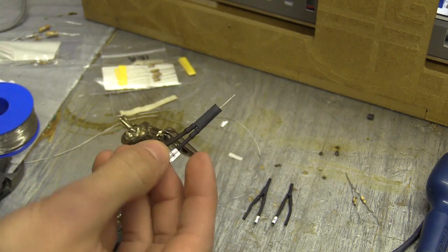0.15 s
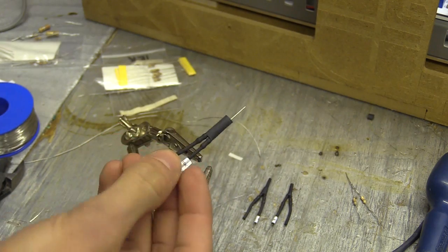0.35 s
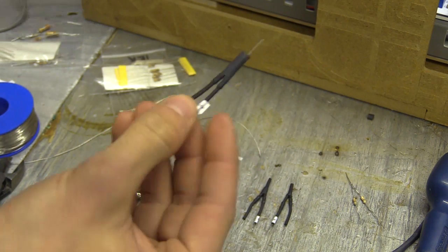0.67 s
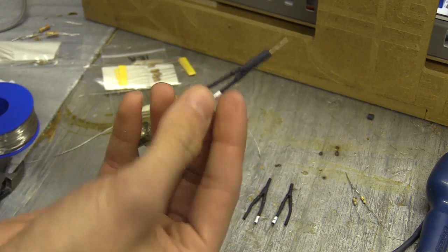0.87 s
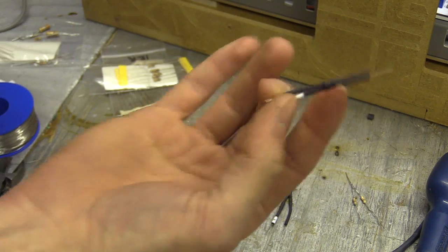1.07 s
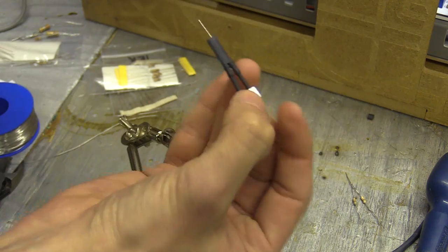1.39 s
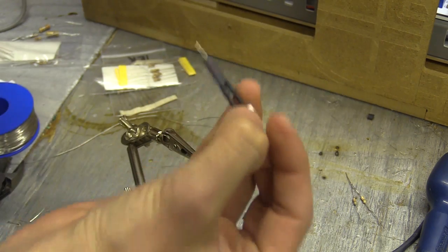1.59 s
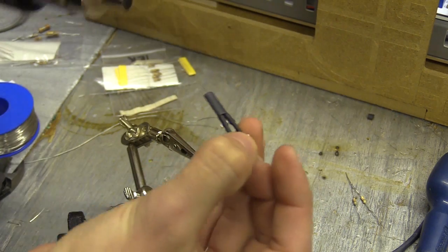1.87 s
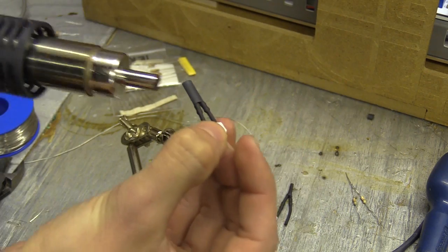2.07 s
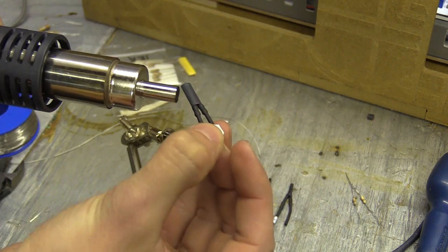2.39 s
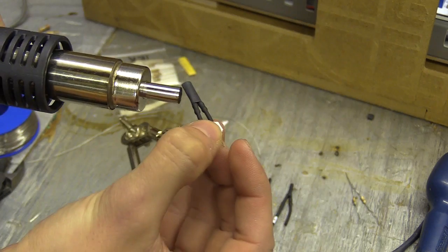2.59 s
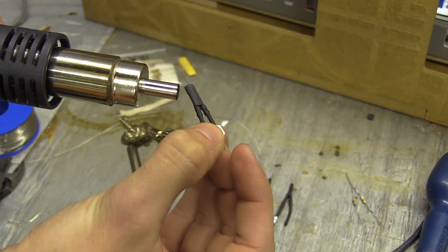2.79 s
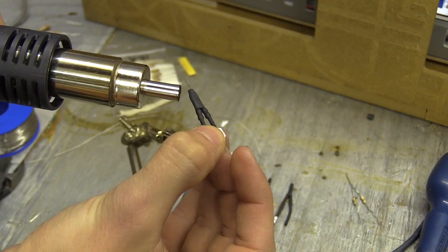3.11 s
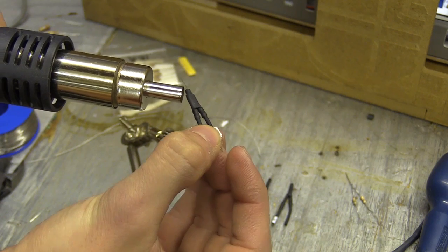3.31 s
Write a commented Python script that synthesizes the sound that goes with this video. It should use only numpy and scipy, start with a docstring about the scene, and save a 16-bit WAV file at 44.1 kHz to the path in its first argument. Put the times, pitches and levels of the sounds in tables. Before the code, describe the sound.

A hot-air heat gun spins up after handling clicks, blowing steady hiss with a high whine.

```python
"""A heat gun on a wooden workshop bench, heard close by a mono microphone (same signal on both channels).
First it is handled: taps ring bench, grip, casing and metal as mode clusters, and shaped noise scrapes and rustles.
At 0.76 s it is switched on: brush tones and a fan whine glide up with the shaft inside the air jet's hiss.
Near 1.2 s it is lifted with a run of knocks, the hum stops and the brush tones sink into the hiss.
It turns partly towards the work and back, then from 1.98 s fully; room tone lies under everything."""
import sys
import numpy as np
from scipy import signal
from scipy.io import wavfile
from scipy.ndimage import uniform_filter1d

SR = 44100
rng = np.random.default_rng(int(sys.argv[2]) if len(sys.argv) > 2 else 0)


def persist_wave(psi):
    """Save psi, clipped to +-1, as 16-bit WAV."""
    counts = np.round(np.clip(psi, -1, 1) * 32767).astype(np.int16)
    wavfile.write(sys.argv[1], SR, np.atleast_2d(counts).T)


N = 152145
T = np.arange(N) / SR  # s


def amp(db):
    """Decibels to linear amplitude."""
    return 10 ** (np.asarray(db, float) / 20)


def evened(x):
    """Scale to unit RMS."""
    return x / np.sqrt(np.mean(x ** 2) + 1e-20)


def read(points, hz):
    """Read a frequency table in dB, interpolated over log frequency."""
    f, value = np.transpose(points)
    return np.interp(np.log(hz + 1), np.log(f + 1), value)


def curve(table, column=1):
    """Follow one column of a time table sample by sample."""
    rows = np.array(table)
    return np.interp(T, rows[:, 0], rows[:, column])


def drift(top_hz):
    """Slow random wandering of unit RMS: sines from 0.3 Hz to top_hz, the slower ones stronger."""
    waves = (np.sin(2 * np.pi * (f * T + rng.random())) / np.sqrt(f)
             for f in np.geomspace(.3, top_hz, num=24))
    return evened(sum(waves))


def noise(shape_db, patchy_db):
    """Unit-RMS noise from random short-time spectra; shape_db(hz, s) colours it, with drifting patches."""
    hz = np.fft.rfftfreq(1024, 1 / SR)[:, None]
    t = np.arange(N // 256 + 5) * 256 / SR
    real, imaginary, patches = rng.standard_normal((len(t), len(hz), 3)).T
    patches = uniform_filter1d(patches, size=10, axis=0)  # smooth over frequency
    patches = evened(uniform_filter1d(patches, size=14, axis=1))  # smooth over time
    spectra = (real + 1j * imaginary) * amp(shape_db(hz, t) + patchy_db * patches)
    return evened(signal.istft(spectra, nperseg=1024, noverlap=768)[1][:N])


def steady_noise(colour, patchy_db):
    """Noise whose mean colour stays put, read from a (frequency [Hz], density [dB per Hz]) table."""
    return noise(lambda hz, t: read(colour, hz) + 0 * t, patchy_db)


SWITCH_S, SPIN_UP_S = .757, .232  # switch-on time, spin-up time constant


def speed(t):
    """Share of full speed: the shaft closes in exponentially after switch-on."""
    return np.clip(1 - np.exp((SWITCH_S - t) / SPIN_UP_S), 0, 1)


# Air hiss at the microphone: (time [s], level [dB])
JET_LEVEL = [(.76, -71), (.84, -57.5), (.95, -45.5), (1.06, -38.5), (1.22, -33.5), (1.45, -32), (1.75, -30),
             (1.96, -30), (2.2, -28), (2.62, -27), (3.1, -27.5), (3.45, -27.5)]
# Turn of the nozzle: (time [s], share of the turn towards the work [0-1])
NOZZLE_TURN = [(1.4, 0), (1.7, .25), (1.98, 0.00054), (2.1, 0.85), (2.4, 1)]
# Relative hiss colour, nozzle turned away: (frequency [Hz], density [dB per Hz])
ASIDE_COLOUR = [(60, -28), (100, -24.5), (240, -10.5), (470, -12), (900, -15), (1500, -18), (1700, -10.5),
                (2340, -12), (2830, -6), (3700, -7), (4500, -11), (5300, -4.5), (6000, -2.5), (6600, -4.5),
                (7400, 2.5), (8100, -4.5), (9000, -6), (10100, -3.5), (11500, -10.5), (13500, -17.5),
                (14500, -19), (15700, -13)]
# Relative hiss colour, nozzle over the work: (frequency [Hz], density [dB per Hz])
AIMED_COLOUR = [(60, -45), (100, -25), (243, -18), (489, -16), (778, -20), (1190, -18), (1320, -22),
                (2020, -14), (3420, -14), (4300, -11), (4700, -8), (5300, -1), (5650, -3), (5880, -7),
                (6100, -3), (6900, -4), (7650, -10), (8100, -7), (8700, -10), (9250, -7), (9950, -18),
                (10400, -10), (11400, -11), (11750, -14), (12500, -10), (13500, -22), (14200, -19),
                (14700, -25), (15150, -27), (15500, -20)]
DULL_DB, DULL_HZ = -36, 6960  # treble slope at standstill (dB per octave), and where it starts
PATCHY_DB, SWELL_DB = 1.1, .4  # RMS unevenness of hiss colour and of hiss level


def jet():
    """Air hiss: turbulent noise recoloured as the nozzle turns, its treble growing with fan speed."""
    def shape_db(hz, t):
        aim = np.clip(np.interp(t, *np.transpose(NOZZLE_TURN)), 0, 1)
        db = (1 - aim) * read(ASIDE_COLOUR, hz) + aim * read(AIMED_COLOUR, hz)
        octaves_up = np.log2(np.maximum(hz / DULL_HZ, 1))
        db = db + DULL_DB * (1 - speed(t)) * octaves_up
        return db - 10 * np.log10((amp(db) ** 2).mean(0))  # equal power at every moment

    level = amp(curve(JET_LEVEL) + SWELL_DB * drift(5.9))
    return (T > SWITCH_S) * level * noise(shape_db, PATCHY_DB)


# Shaft speed once spun up: (time [s], turns per second [Hz])
SHAFT_SPEED = [(1.9, 383.6), (2.3, 383.9), (2.8, 382.5), (3.05, 383.1), (3.3, 382.3), (3.45, 383.0)]
# Brush tones, four contacts a turn: one shaft order each [multiples of shaft speed]
BRUSH_TONE_ORDERS = (12, 20, 24, 28, 36)
# Relative level of each brush tone, in the same order: (level [dB])
BRUSH_TONE_LEVELS = (-2, 0, -1, -2, -3)
# How the casing passes the brush tones: (frequency [Hz], gain [dB])
CASING_VENTS = [(1500, -25), (2600, -8), (3400, -9), (4300, -14), (4900, -1), (6300, 0), (7500, 0),
                (8300, -14), (12000, -30)]
# Lasting whines: (time [s], order-16 tone RMS level [dB], fan whine RMS level [dB])
WHINE_LEVELS = [(.8, -95, -95), (.88, -75, -60), (.96, -64, -50), (1.09, -58, -48), (1.14, -48, -48),
                (1.3, -45, -51), (1.45, -44, -55), (1.6, -42, -52), (2.0, -42, -50), (2.12, -35, -46),
                (2.6, -35, -45), (3.0, -35, -42), (3.45, -33, -41)]
MAIN_ORDER, FAN_ORDER = 16, 33  # multiples of shaft speed
BRUSH_DB, BRUSH_FADE_S, BRUSH_FADE_DB = -7, (1.1, 1.25), -22  # re hiss level; the fade; its depth
BRUSH_FLUTTER_DB, TONE_FLUTTER_DB = 3, 1.5  # RMS
WAVER = .0004  # RMS share of shaft speed


def motor():
    """Shaft orders follow the speed: brush tones that sink into the hiss, and two whines that stay."""
    hz = curve(SHAFT_SPEED) * speed(T) * (1 + WAVER * drift(10))
    turn = 2 * np.pi * np.cumsum(hz) / SR  # shaft angle, rad
    brush_level = curve(JET_LEVEL) + BRUSH_DB + np.interp(T, BRUSH_FADE_S, [0, BRUSH_FADE_DB])
    out = np.zeros(N)
    for order, db in zip(BRUSH_TONE_ORDERS, BRUSH_TONE_LEVELS):
        tone_db = brush_level + db + read(CASING_VENTS, order * hz) + BRUSH_FLUTTER_DB * drift(30)
        out += amp(tone_db) * np.sin(order * turn)
    for column, order in enumerate((MAIN_ORDER, FAN_ORDER), 1):
        tone_db = curve(WHINE_LEVELS, column) + TONE_FLUTTER_DB * drift(40)
        out += np.sqrt(2) * amp(tone_db) * np.sin(order * turn)
    return out * (T > SWITCH_S)


# Taps and knocks: (time [s], bench, grip, casing and small metal part levels [dB each],
# rise [s, never under 0.1 ms], ring [multiple of the mode tables' T60])
KNOCKS = [(0.054, -40, -47, -51, -28.5, 0.00036, 0.83), (.105, -54, -51.5, -57, -54, .001, 1.2),
          (.291, -48.5, -51, -66, -52, 0.0014, 2.5), (.345, -43.5, -61, -64, -64, 0.0016, 0.63),
          (.384, -52, -45.5, -62, -58, 0.016, 1.7), (.412, -65, -53, -63, -61, 0.0026, 0.5),
          (.437, -55, -60, -70, -63, 0.0027, 1.3), (0.462, -38, -46.5, -39, -37, 0.0072, 1.15),
          (.506, -40, -58, -57, -66, 0.014, 0.54), (0.6318, -70, -66, -61, -43.5, 0.000075, .4),
          (1.192, -46.5, -52, -70, -70, .004, 1.2), (1.2349, -31.5, -41, -43, -38, 0.00088, 1.6),
          (1.2484, -35, -36.5, -29.5, -46, .0003, 0.6), (1.2555, -32, -39, -41.5, -62, 0.00069, 1.3),
          (1.273, -35.5, -50, -51, -70, 0.0016, 1.2), (1.978, -62, -40, -70, -75, 0.0052, 1.4),
          (3.22, -47, -55, -69.5, -66.5, 0.0049, 1.3)]
# Wooden bench modes: (frequency [Hz], level [dB], T60 at ring 1 [s])
BENCH_MODES = [(239, -1, 0.08), (298, -2, 0.084), (387.5, 10.5, 0.048), (488.7, 8.5, 0.081),
               (598, -1.5, 0.065), (673, 5, 0.041)]
# Grip modes: (frequency [Hz], level [dB], T60 at ring 1 [s])
GRIP_MODES = [(843, -3.5, 0.03), (990, 4, 0.039), (1164, -2.5, 0.062), (1453, -2.5, 0.024)]
# Casing modes: (frequency [Hz], level [dB], T60 at ring 1 [s])
CASING_MODES = [(1760, -3.5, .03), (1918, 3.5, 0.042), (2395, 3, 0.061), (2940, -3, 0.097),
                (3340, -4, 0.02), (3740, 3.5, 0.049)]
# Small metal part modes: (frequency [Hz], level [dB], T60 at ring 1 [s])
METAL_MODES = [(3770, -8, 0.057), (4270, 4.5, 0.036), (4780, 8.5, 0.023), (5260, 10, 0.017),
               (5950, 6.5, 0.023), (6170, -3, 0.024), (7370, 3.5, 0.022), (8200, 0, .025),
               (9500, -5, 0.024), (10070, 3.5, 0.012), (11300, -1, 0.023), (12400, 9, 0.011),
               (13500, 5, .012), (15200, 8, 0.018)]
SPREAD_DB, CLUSTER = 3, .045  # random spread of level, and of frequency as a share, in a mode cluster
BASS_CUT_HZ = 190


def hits():
    """Each contact rings bench, grip, casing and metal; a mode is four unevenly excited neighbours."""
    out, t = np.zeros(N + SR), np.arange(SR // 8) / SR
    for s, *parts_db, rise, ring in KNOCKS:
        for modes, part_db in zip((BENCH_MODES, GRIP_MODES, CASING_MODES, METAL_MODES), parts_db):
            hz, db, t60 = np.repeat(modes, 4, 0).T[:, :, None]
            size, detune, phase = rng.standard_normal((3, len(hz), 1))
            decay = amp(db + SPREAD_DB * size - 60 * t / (ring * t60))
            cycles = hz * (1 + CLUSTER * detune) * t + phase
            body = (decay * np.sin(2 * np.pi * cycles)).sum(0)
            sound = body * np.minimum(t / max(rise, 1e-4), 1)
            start_rms = np.sqrt(np.mean(sound[:SR // 80] ** 2))  # first 12.5 ms
            out[round(s * SR):][:len(t)] += amp(part_db) * sound / start_rms
    bass_cut = signal.butter(3, BASS_CUT_HZ, "high", fs=SR, output="sos")
    return signal.sosfilt(bass_cut, out[:N])


# Things slide and rub: (start [s], length [s], low scrape level [dB], high rustle level [dB])
SLIDES = [(0, 0.041, -50.5, -61.5), (0.053, 0.082, -52, -55), (0.255, 0.024, -58, -54.5),
          (.29, 0.043, -52, -59.5), (.335, 0.099, -48, -58.5), (0.459, 0.056, -59, -49),
          (0.532, 0.087, -85, -54.5), (0.631, 0.026, -72, -52), (0.713, 0.1, -56, -65)]
# Relative colour of the scrape on wood: (frequency [Hz], density [dB per Hz])
SCRAPE_COLOUR = [(150, -28), (250, 1.5), (480, 3.5), (750, -2), (1100, -5.5), (1600, -11.5), (2600, -20),
                 (4000, -46)]
# Relative colour of the rustle: (frequency [Hz], density [dB per Hz])
RUSTLE_COLOUR = [(1200, -31), (2500, -10.5), (3500, -0.5), (5300, -0.5), (7500, -7), (10200, -5.5),
                 (15700, -17)]
RUB_EDGE_S = 0.024  # ramp, centred on each start and end


def sliding():
    """Friction as gated noise: low scrape on the wood and a thin rustle of fingers and wire."""
    low, high = steady_noise(SCRAPE_COLOUR, 4.3), steady_noise(RUSTLE_COLOUR, 4.1)
    out = np.zeros(N)
    for s, length, low_db, high_db in SLIDES:
        inside = np.minimum(T - s, s + length - T)  # s from the nearer end
        gate = np.clip(inside / RUB_EDGE_S + .5, 0, 1)
        out += gate * (amp(low_db) * low + amp(high_db) * high)
    return out


WET_DB, TAIL_S = -14.5, 0.088  # level of the tail, its T60


def reflections(x):
    """A short diffuse tail: convolution with decaying noise that starts after 4 ms."""
    t = np.arange(SR // 3) / SR
    tail = rng.standard_normal(len(t)) * amp(-60 * t / TAIL_S) * (t > .004)
    return amp(WET_DB) * signal.fftconvolve(x, tail / np.linalg.norm(tail))[:N]


# Relative colour of the workshop air: (frequency [Hz], density [dB per Hz])
ROOM_COLOUR = [(25, -36), (60, -7.5), (130, -3.5), (270, -7.5), (520, -2.5), (800, -9), (1300, -17.5),
               (1770, -16), (2700, -25), (5000, -22), (9000, -29), (15700, -27)]
ROOM_DB = -58
HUM_HZ, HUM_DB, HUM_END_S = 251.5, -61, 1.19


def room_tone():
    """Workshop air as noise, with a faint wavering sine hum that stops when the gun leaves the bench."""
    hum = amp(HUM_DB + 2.8 * drift(9.8)) * np.sin(2 * np.pi * HUM_HZ * T)
    hum *= np.interp(T, [HUM_END_S - .03, HUM_END_S], [1, 0])
    return hum + amp(ROOM_DB) * steady_noise(ROOM_COLOUR, 3.6)


def scene():
    """Sum all sources, the tail following the knocks only, onto two equal channels."""
    knocks = hits()
    mono = jet() + motor() + knocks + sliding() + reflections(knocks) + room_tone()
    return np.tile(mono, (2, 1))


EDGE_HZ = 15740


def record(dry):
    """Band limit: a steep linear-phase low-pass at EDGE_HZ."""
    low_pass = signal.firwin(1023, EDGE_HZ, window=("kaiser", 10), fs=SR)
    return signal.oaconvolve(dry, low_pass[None], "same")


dry = scene()
out = record(dry)
persist_wave(out)
```